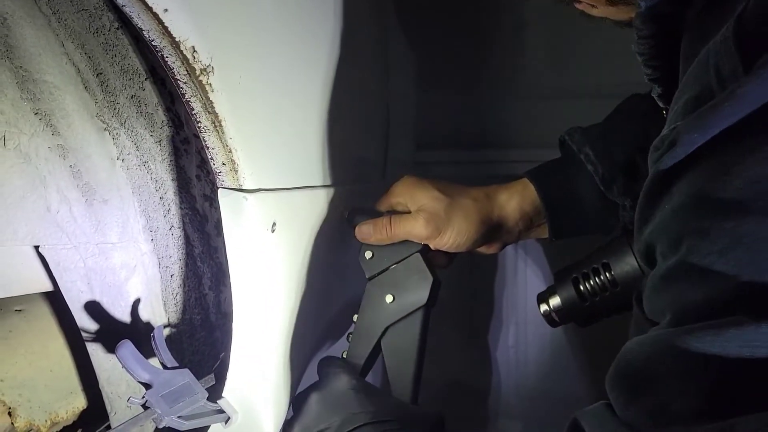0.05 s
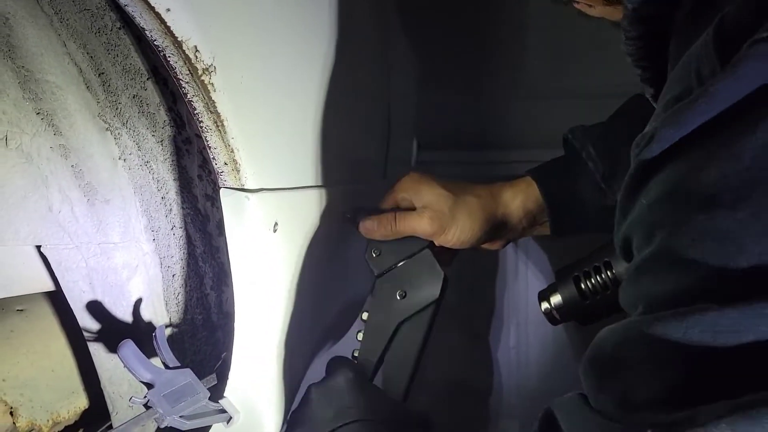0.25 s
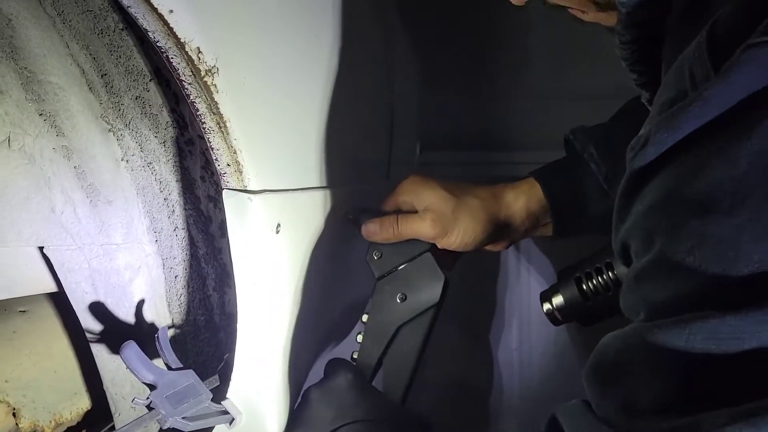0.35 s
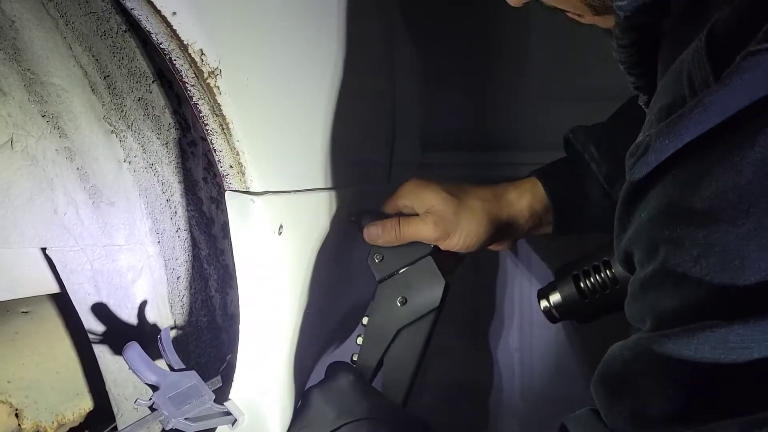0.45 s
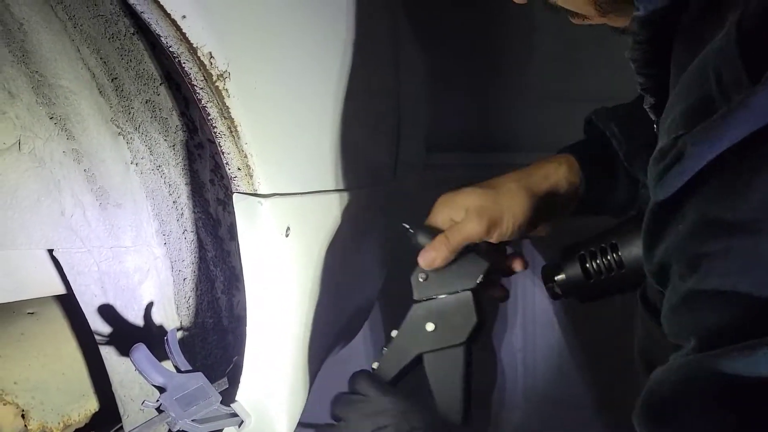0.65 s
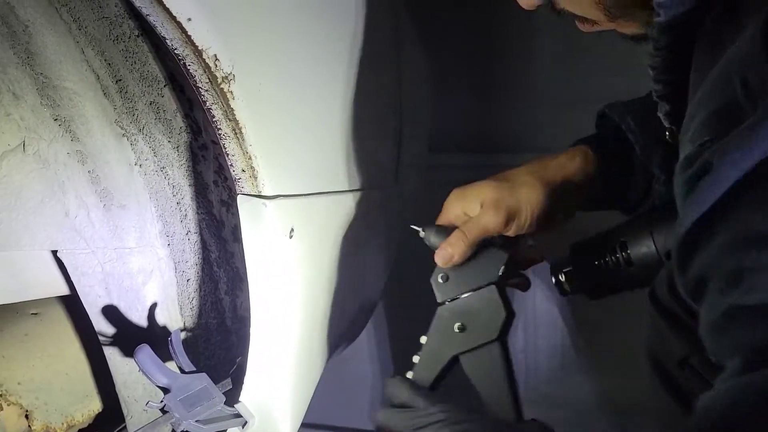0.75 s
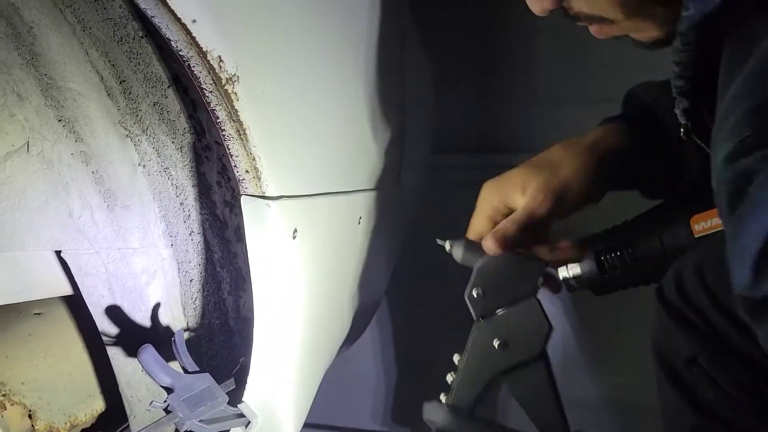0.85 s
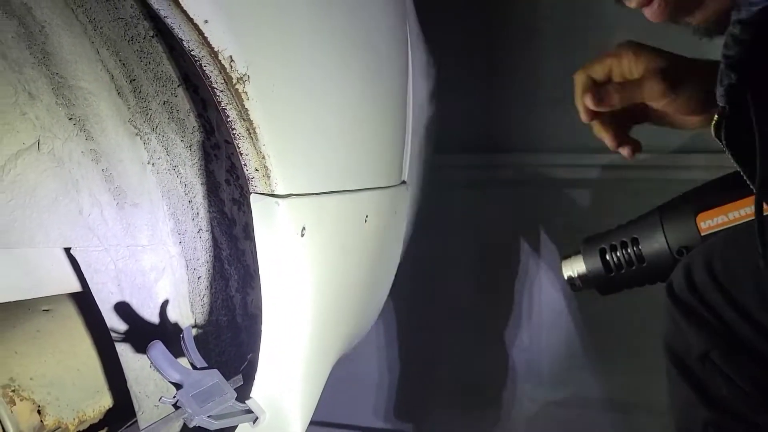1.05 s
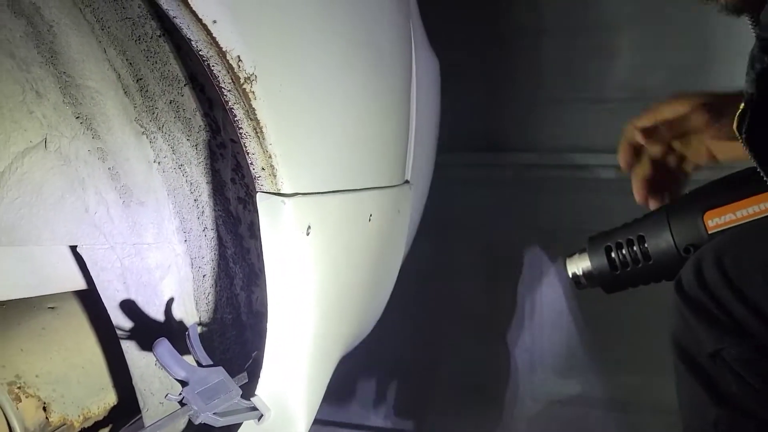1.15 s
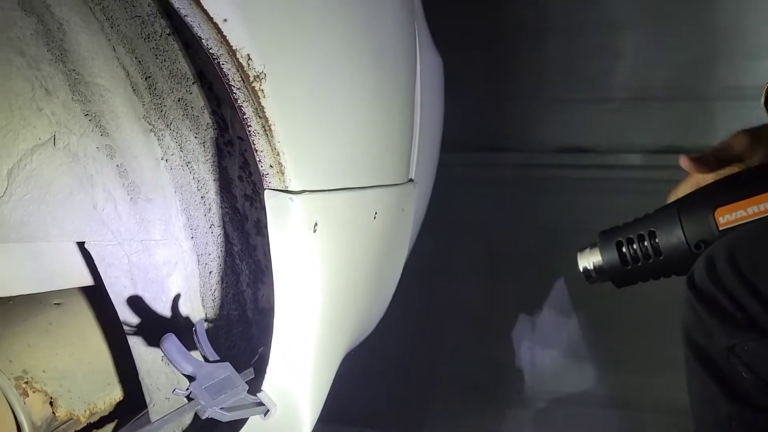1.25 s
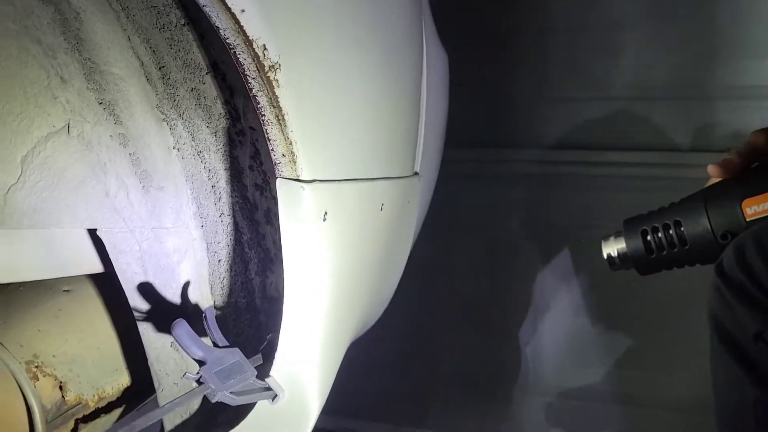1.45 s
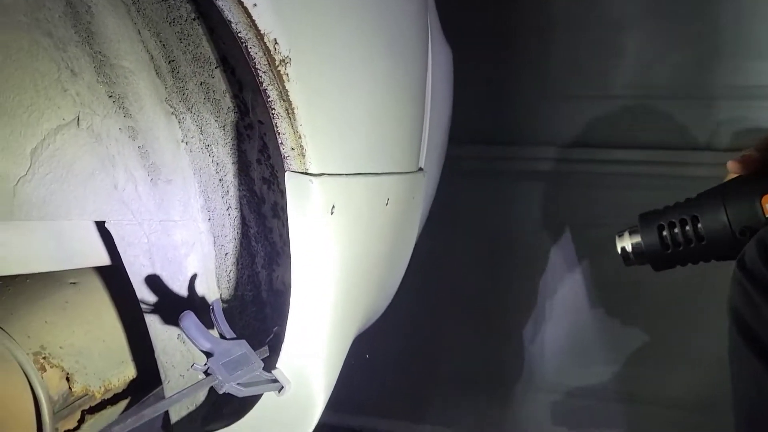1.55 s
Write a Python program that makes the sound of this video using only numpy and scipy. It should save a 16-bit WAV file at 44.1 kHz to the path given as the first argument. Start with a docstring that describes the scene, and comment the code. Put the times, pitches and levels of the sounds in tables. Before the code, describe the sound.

Rivet snapping loudly on a hollow panel in a garage, with a heat gun humming and hissing

```python
"""A hand rivet gun snaps its mandrel on a loose fiberglass panel in a garage, taken in stereo: a sharp crack of
noise and ringing steel, then the room's ring-out. The panel, a bank of struck modes, booms, knocks a few more
times and later judders as it slides; the tool, short bands of noise, clicks as it is freed. Behind them a heat
gun hums and hisses throughout, from shaft harmonics and shaped noise; after the crack the background drops in
level and slowly, unevenly grows again."""
import sys
import numpy as np
from scipy import signal
from scipy.fft import rfft, irfft
from scipy.io import wavfile
from scipy.ndimage import uniform_filter1d

SR = 44100
rng = np.random.default_rng(int(sys.argv[2]) if len(sys.argv) > 2 else 0)


def bounce(signal):
    """Save signal as a 16-bit WAV file at the path given by the first command-line argument."""
    frames = np.transpose(np.atleast_2d(signal))
    limited = np.clip(frames, -1, 1)
    pcm = np.round(limited * 32767).astype(np.int16)
    wavfile.write(sys.argv[1], SR, pcm)


N = 70560
T = np.arange(N) / SR  # time [s]

# colour of the mandrel's snap: (frequency [Hz], relative level per Hz [dB])
SNAP_COLOUR = [(300, 0.5), (600, -1), (1100, -3.5), (1700, -16), (2300, -12.5), (2800, -15.5), (4000, -15),
               (5600, -32), (6800, -14), (9000, -18.5), (12500, -19.5), (16000, -14)]
# the cracks of the snap: (time after the snap [s], relative level [dB])
SNAP_CRACKS = [(0, -4), (.0007, 3), (.0034, 2), (.0062, -8), (.0095, -12)]
# modes of the tool's steel jaws and handles, rung by the snap: (frequency [Hz], level [dB], t60 [s])
STEEL_MODES = [(990, -8, 0.014), (1320, -14, 0.02), (1640, -20.5, 0.13), (2720, -22.5, .09),
               (4930, -17.5, 0.032), (6270, -27.5, 0.15), (6600, -24, .05), (8100, -23, 0.046),
               (11950, -23, .08), (13000, -23, 0.11)]
# ring-out of the snap in the garage: (frequency [Hz], t60 [s])
GARAGE_DECAY = [(60, 1), (150, 0.96), (400, 0.58), (1000, 0.39), (3000, 0.36), (8000, 0.26), (16000, 0.24)]
# colour of that ring-out: (frequency [Hz], relative level per Hz [dB])
GARAGE_TAIL_COLOUR = [(45, -10), (90, -17.5), (160, -19.5), (340, -10.5), (750, -12), (1400, -18.5),
                      (2800, -24.5), (4500, -31.5), (7400, -26.5), (12000, -30), (16000, -30.5)]
# panel modes: (frequency [Hz], level when struck [dB], t60 when struck [s], level when rubbed at the edge [dB])
PANEL_MODES = [(58.5, -15, 0.8, -9), (91.3, -4.5, 0.26, -25), (110.4, -5, 0.39, -2), (127.7, -4, 0.21, 0),
               (205, 0, 0.18, 6.5), (264, -11, 0.078, -39), (328.5, -4.5, 0.25, -7.5),
               (366.8, -4.5, 0.23, -1.5), (399.6, -5, 0.22, 5.5), (454, -16, 0.17, -25),
               (566, -3.5, 0.17, -24), (723, -3.5, 0.31, -27), (848, 2.5, 0.14, -26),
               (910, -18, 0.085, -26)]
# blows on the panel: (time [s], level [dB], push length [ms])
PANEL_BLOWS = [(0.2246, -28, 0.96), (0.2444, -10, 2.8), (0.2584, -18.5, 1.06), (.283, -19.5, 2.5),
               (0.333, -19, 5.2), (.385, -28, 3.1), (0.4, -28.5, 4.7), (0.433, -31, 5.2), (0.504, -34, 1.3),
               (0.524, -31.5, 5.2), (0.577, -34.5, 2.7), (0.598, -35, 1.9), (0.654, -40.5, 3.3),
               (1.016, -36, 4.3), (1.037, -44.5, 2.1)]
# the panel edge sticks and slips: (time [s], slip rate [1/s], level [dB])
EDGE_SLIPS = [(0.849, 69, -44), (.875, 69, -40), (.895, 68, -42), (.91, 67.5, -34), (0.951, 67, -32),
              (0.984, 65, -34), (.997, 60, -50)]
# clicks of the tool, and the garage's soft, wide ring-out after the click at 0.66 s (the long row at 0.662 s):
# # (time [s], level [dB], centre [Hz], width [Hz], t60 [s])
TOOL_CLICKS = [(0.502, -39, 1740, 2220, 0.05), (0.502, -33.5, 797, 400, 0.15),
               (0.532, -52, 7450, 1500, 0.11), (.583, -49, 12500, 1800, 0.16),
               (0.6056, -39.5, 2670, 1000, 0.086), (0.604, -38, 7000, 5000, .015),
               (0.605, -43, 7950, 600, 0.061), (.606, -49, 11600, 600, .12),
               (0.625, -48, 8040, 1000, 0.044), (0.659, -43, 5000, 1000, 0.06),
               (0.6594, -25, 9800, 2500, 0.0074), (0.6597, -27.5, 9800, 14000, 0.0088),
               (0.662, -45.5, 10000, 12000, 0.28), (.675, -48, 14400, 2000, 0.02),
               (.698, -52, 14300, 2000, 0.022), (0.914, -41.5, 3300, 500, 0.058),
               (.9145, -40, 5000, 4000, 0.014)]
# heat gun: (time [s], shaft hum [dB], fan-blade whine [dB], hiss [dB],
#            treble against the hiss [dB], whine left minus right [dB])
GUN_LEVELS = [(0, -38, -47.5, -38.5, -4, 4), (0.204, -38, -47, -36.5, 1.5, 2),
              (.45, -49.5, -60, -45, -3.5, 16.5), (.7, -41.5, -51, -44, -1.5, -0.5),
              (.9, -47.5, -46, -44.5, 1, 2), (1.02, -48, -46, -43.5, 1.5, 6),
              (1.1, -43.5, -46.5, -42.5, 0.5, 3.5), (1.3, -43.5, -42, -43, 3.5, 2),
              (1.45, -42.5, -40.5, -41.5, 2, 2), (1.6, -42, -43, -42, 4.5, -5)]
# stronger motor lines, before they follow the hiss and treble:
# (multiple of the shaft rate, level at the start [dB], level at the end [dB])
MOTOR_LINES = [(7, -60, -59), (9, -63, -63), (20, -70, -64), (25, -65, -73), (35, -72, -70), (37, -75, -65),
               (40, -69, -68)]
# colour of the air jet: (frequency [Hz], relative level per Hz [dB])
HISS_COLOUR = [(150, -8), (290, -16.5), (430, -10), (800, -0.5), (1200, -1), (1550, -10), (1850, -5.5),
               (2200, -10), (2800, -5), (3400, -14.5), (4150, -13), (5200, -22), (7800, -16), (9500, -24),
               (13000, -22.5), (16000, -38)]
# colour of the low rumble: (frequency [Hz], relative level per Hz [dB])
RUMBLE_COLOUR = [(30, -28), (55, 1.5), (100, 0.5), (150, -10), (300, -24.5)]

SNAP_S, SNAP_RISE_S, SNAP_T60_S, SNAP_DB = 0.2243, 0.00038, 0.07, -19
CRACK_RISE_S, CRACK_T60_S, CRACK_DB = 0.00026, 0.011, -5
STEEL_PUSH_MS = 0.07
GARAGE_DB, GARAGE_CLUMP_DB = -9.5, 2.5
GARAGE_RISE_S, GARAGE_BASS_LATE_HZ = 0.0062, 245  # the ring-out builds more slowly in the bass
JUDDER_PUSH_MS, JUDDER_DAMP = 2.85, 0.33  # rubbing shortens each panel t60 by this factor
JUDDER_JITTER, JUDDER_SCATTER_DB = 0.025, 1.5  # jitter as a share of the mean slip period
SHAFT_HZ, BLADES = 205.34, 6
HUM_LAG_RAD, WHINE_LAG_RAD = 0.35, 1.89  # phase lead of the right channel
COMB_DB, COMB_SCATTER_DB, COMB_WAVER_DB = -75, 2.5, 2  # the remaining motor lines
TREBLE_HZ, FLICKER_DB = 4660, 1.2
RUMBLE_DB, RUMBLE_FLICKER_DB = -56, 3.5
BASS_WIDE, ALIKE_HZ = 0.14, 355  # side share left in the bass; the channels grow alike below this frequency
MIC_LOW_HZ, TOP_HZ = 64, 15900
MIC_DIP_HZ, MIC_DIP_WIDTH_HZ, MIC_DIP_SHARE = 10800, 4600, 0.59


def snap():
    """The mandrel breaks: bright cracks over a short burst of noise, with the steel ringing and the garage after."""
    cracks = sum(undb(CRACK_DB + db) * fade(SNAP_S + s, CRACK_RISE_S, CRACK_T60_S) for s, db in SNAP_CRACKS)
    body = undb(SNAP_DB) * fade(SNAP_S, SNAP_RISE_S, SNAP_T60_S)
    burst = noise(SNAP_COLOUR, lambda hz: 1) * (cracks + body)
    return burst + tool_steel() + garage()


def tool_steel():
    """Each crack of the snap pushes the jaws and handles, which ring at their own modes."""
    force = sum(undb(db) * push(SNAP_S + s, STEEL_PUSH_MS) for s, db in SNAP_CRACKS)
    return ring(force, STEEL_MODES)


def garage():
    """Patchy ring-out of the place: each band builds and fades at its own pace, so it dulls as it fades."""
    def band_envelope(hz):
        rise = GARAGE_RISE_S * (1 + (GARAGE_BASS_LATE_HZ / hz) ** 2)
        clumps = undb(GARAGE_CLUMP_DB * walk(70.06))
        return clumps * fade(SNAP_S, rise, curve(GARAGE_DECAY, hz))

    return undb(GARAGE_DB) * noise(GARAGE_TAIL_COLOUR, band_envelope)


def knocks():
    """Blows push the panel away from the microphone and its modes ring."""
    force = -sum(undb(db) * push(s, ms) for s, db, ms in PANEL_BLOWS)
    struck = [(hz, db, t60) for hz, db, t60, _ in PANEL_MODES]
    return ring(force, struck)


def judder():
    """The sliding edge sticks and slips: a jittered train of pushes drives the panel modes, more damped."""
    s, rate, db = np.array(EDGE_SLIPS).T
    sliding = (T > s[0]) * (T < s[-1])
    turns = np.cumsum(np.interp(T, s, rate) * sliding) / SR
    slips = T[1:][np.diff(np.floor(turns)) > 0]  # one slip per whole turn
    late, size = rng.standard_normal((40, 2))[:len(slips)].T
    slips = slips + JUDDER_JITTER * late / rate.mean()
    levels = np.interp(slips, s, db) + JUDDER_SCATTER_DB * size
    force = -sum(undb(level) * push(u, JUDDER_PUSH_MS) for u, level in zip(slips, levels))
    rubbed = [(hz, db, t60 * JUDDER_DAMP) for hz, _, t60, db in PANEL_MODES]
    return ring(force, rubbed)


def clicks():
    """Short metallic bursts from the tool's jaws and handles, and the garage's soft ring-out after one of them:
    fading band noise, partly shared by the channels."""
    out = np.zeros((2, N))
    for s, db, hz, width, t60 in TOOL_CLICKS:
        band = [max(hz - width / 2, 50), min(hz + width / 2, 20000)]
        sos = signal.butter(2, band, "band", fs=SR, output="sos")
        a, b = signal.sosfilt(sos, rng.standard_normal((2, N)))
        pair = np.array([a + 0.96 * b, a - 0.73 * b]) / np.std(a)
        out += undb(db) * fade(s, 0.00044, t60) * pair
    return out


def heat_gun():
    """Motor and air jet follow one set of moving levels, over a low rumble."""
    s, *controls = np.array(GUN_LEVELS).T
    hum, whine, hiss, treble, pan = (np.interp(T, s, c) for c in controls)
    bright = lambda hz: treble / (1 + (TREBLE_HZ / hz) ** 4)  # dB added towards the treble
    return motor(hum, whine, hiss, pan, bright) + air_jet(hiss, bright) + rumble()


def motor(hum, whine, hiss, pan, bright):
    """Sines locked to a slightly wandering shaft: its hum, the blade whine and a comb of higher multiples."""
    phase = 2 * np.pi * np.cumsum(SHAFT_HZ * (1 + 0.0004 * walk(3))) / SR

    def tone(k, db, lag):
        both_phases = k * phase + k * k + np.array([[0], [lag]])
        return np.sqrt(2) * undb(db) * np.sin(both_phases)  # db is rms

    out = tone(1, hum + 0.4 * walk(10.4), HUM_LAG_RAD)
    panned_whine = whine + 3.1 * walk(24.8) + np.array([pan, -pan]) / 2
    out += tone(BLADES, panned_whine, WHINE_LAG_RAD)
    strong = {k: np.interp(T, [0, T[-1]], db) for k, *db in MOTOR_LINES}
    for k, (scatter, lag) in enumerate(rng.standard_normal((76, 2)), 2):
        db = strong.get(k, COMB_DB + COMB_SCATTER_DB * scatter)
        follow = hiss - hiss[-1] + bright(k * SHAFT_HZ)
        out += tone(k, db + follow + COMB_WAVER_DB * walk(11.83), lag)
    return out


def air_jet(hiss, bright):
    """Hiss of the jet: coloured noise whose bands flicker and whose treble moves on its own."""
    return undb(hiss) * noise(HISS_COLOUR, lambda hz: undb(bright(hz) + FLICKER_DB * walk(14.02)))


def rumble():
    """Low noise under everything, each band wavering in level."""
    return undb(RUMBLE_DB) * noise(RUMBLE_COLOUR, lambda hz: undb(RUMBLE_FLICKER_DB * walk(6.4)))


def ring(force, modes):
    """Damped modes (Hz, dB, t60 s) driven by a force; higher ones reach the two channels out of step."""
    out = np.zeros((2, N))
    for k, (hz, db, t60) in enumerate(modes):
        pole = np.exp((2j * np.pi * hz - np.log(1000) / t60) / SR)
        z = signal.lfilter([1], [1, -pole], force + 0j)
        angle = 2 * BASS_WIDE + np.pi / 2 / (1 + (ALIKE_HZ / hz) ** 4)
        turn = np.exp(1j * (-1) ** k * angle)
        out += undb(db) * np.array([z.imag, (z * turn).imag])
    return out


def push(start, ms):
    """A sine-squared pulse of force with unit area."""
    u = (T - start) * 1000 / ms
    return np.where((u > 0) & (u < 1), np.sin(np.pi * u) ** 2, 0) * 2000 / ms / SR


def fade(start, rise, t60):
    """Envelope: a rounded rise, then an exponential fall."""
    u = np.maximum(T - start, 0)
    return (1 - np.exp(-u / rise)) * np.exp(-np.log(1000) * u / t60)


def noise(table, shape):
    """Stereo noise, rms 1 before shape(hz) gives each third-octave band its envelope; nearly mono in the bass."""
    f = np.maximum(np.fft.rfftfreq(N, 1 / SR), 1)
    wide = np.sqrt(BASS_WIDE ** 2 + 1 / (1 + (ALIKE_HZ / f) ** 4))
    colour = undb(curve(table, f)) * (f > table[0][0])  # nothing below the first row
    mid, side = rfft(rng.standard_normal((2, N))) * colour
    pair = np.array([mid + wide * side, mid - wide * side]) / np.sqrt(1 + wide ** 2)
    pair = pair / np.std(irfft(pair, N))
    thirds = np.log2(f / 31.25) * 3
    out = np.zeros((2, N))
    for k in range(28):
        band = irfft(pair * np.clip(1 - abs(thirds - k), 0, 1), N)
        out += band * shape(31.25 * 2 ** (k / 3))
    return out


def walk(rate):
    """Random levels held 1 / rate s and slewed twice."""
    k = int(SR / rate)
    steps = np.repeat(rng.standard_normal(N // k + 1), k)
    return 1.42 * uniform_filter1d(uniform_filter1d(steps, k), k)[:N]


def curve(table, hz):
    """Read a table on a log-frequency axis."""
    a = np.array(table, float)
    return np.interp(np.log(hz), np.log(a[:, 0]), a[:, 1])


def undb(db):
    """Decibels to amplitude."""
    return 10 ** (np.asarray(db) / 20)


def scene():
    """The snap, the panel, the tool and the heat gun together in the garage."""
    return snap() + knocks() + judder() + clicks() + heat_gun()


def record(dry):
    """The microphone lacks deep bass, dips in the treble and rounds the loudest peaks; the top is cut."""
    mic = signal.sosfilt(signal.butter(4, MIC_LOW_HZ, "high", fs=SR, output="sos"), dry)
    b, a = signal.iirpeak(MIC_DIP_HZ, MIC_DIP_HZ / MIC_DIP_WIDTH_HZ, SR)
    mic = mic - MIC_DIP_SHARE * signal.lfilter(b, a, mic)
    top_cut = signal.ellip(10, 0.2, 70, TOP_HZ, fs=SR, output="sos")
    return signal.sosfilt(top_cut, np.tanh(mic))


dry = scene()
out = record(dry)
bounce(out)
```